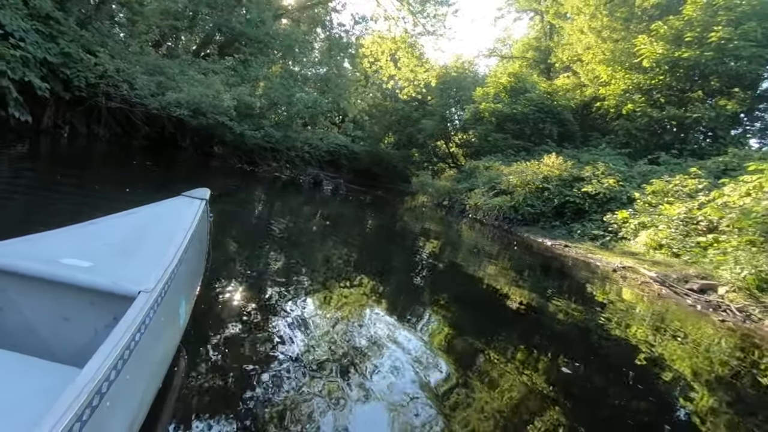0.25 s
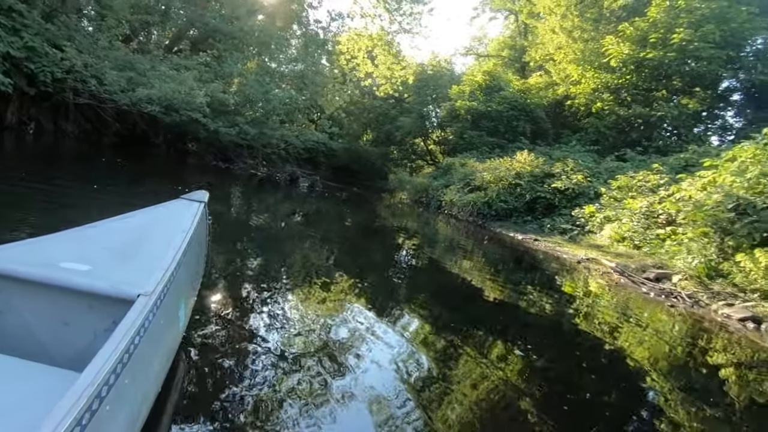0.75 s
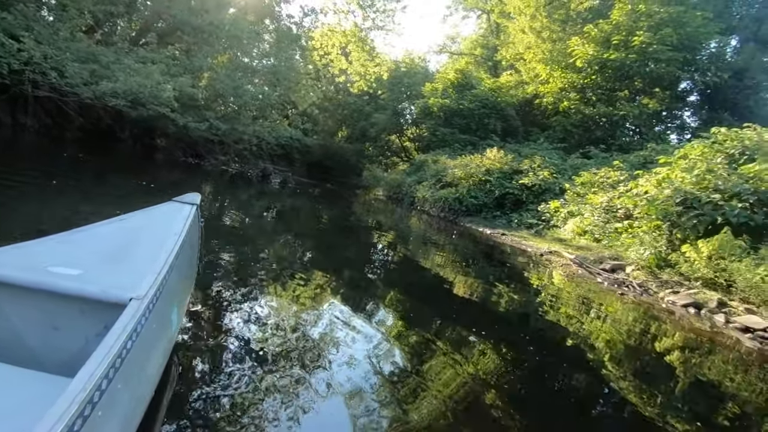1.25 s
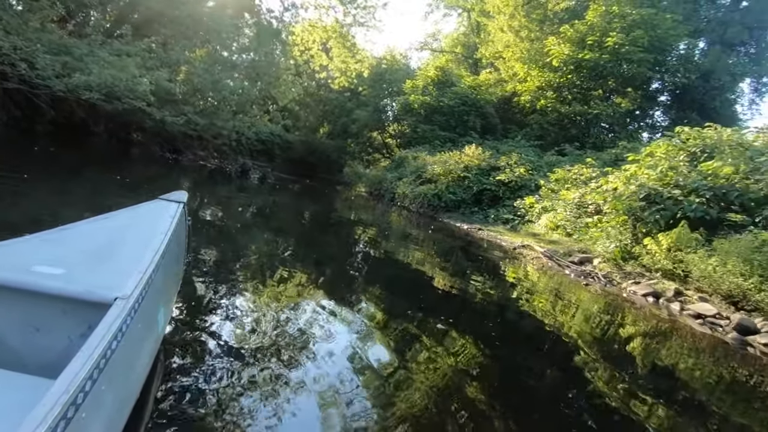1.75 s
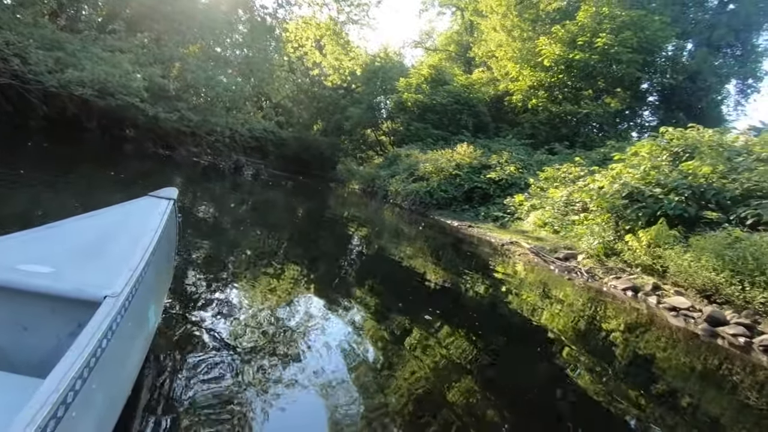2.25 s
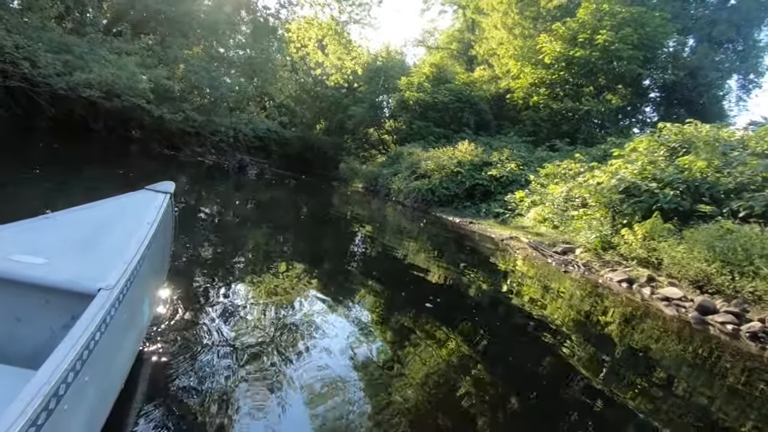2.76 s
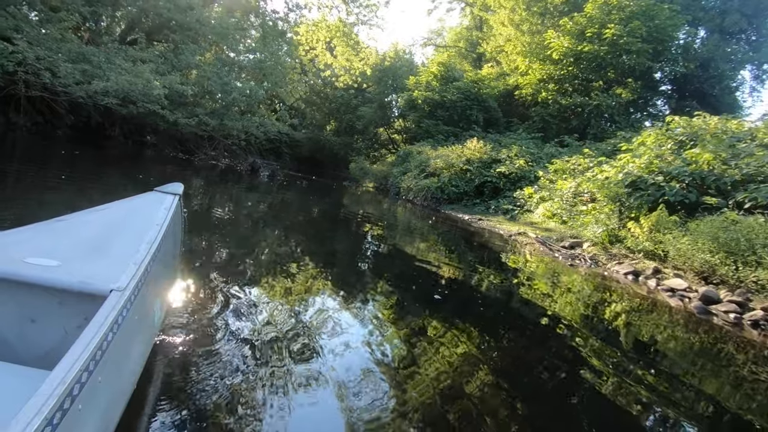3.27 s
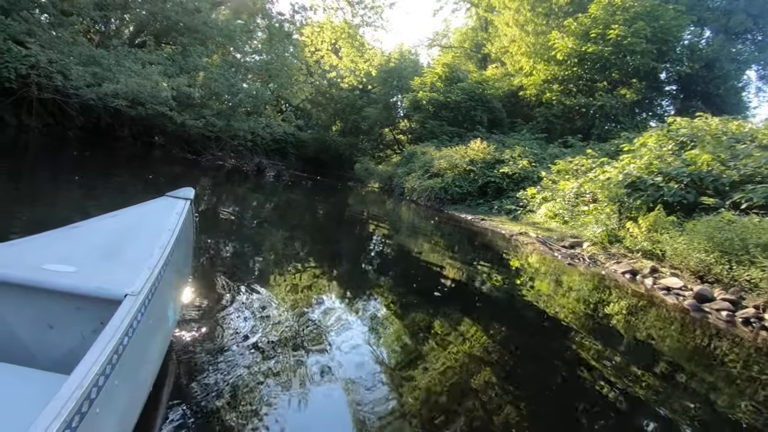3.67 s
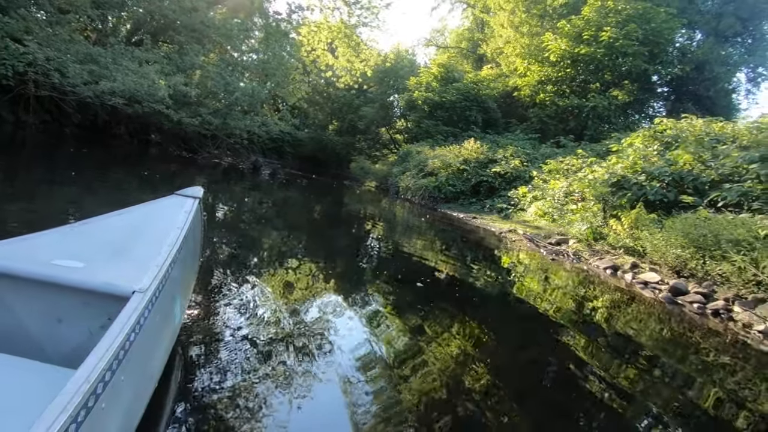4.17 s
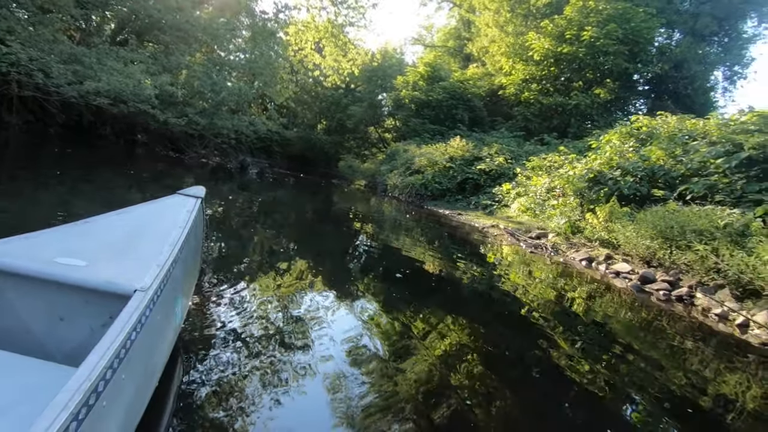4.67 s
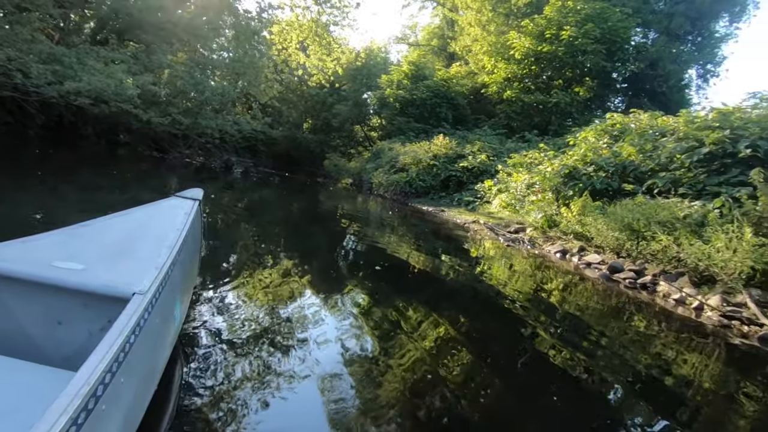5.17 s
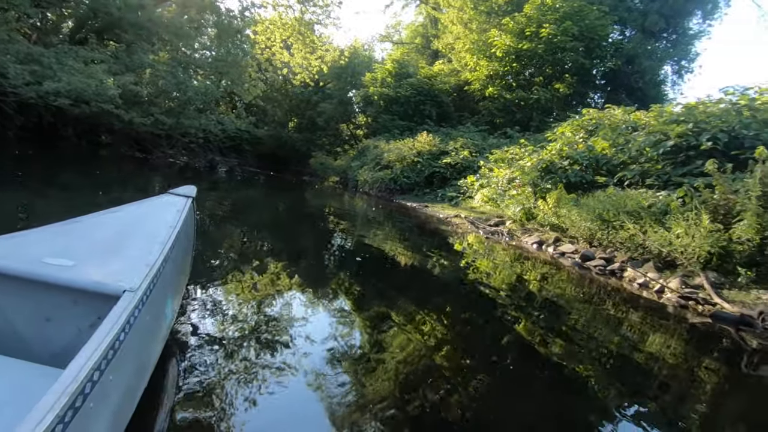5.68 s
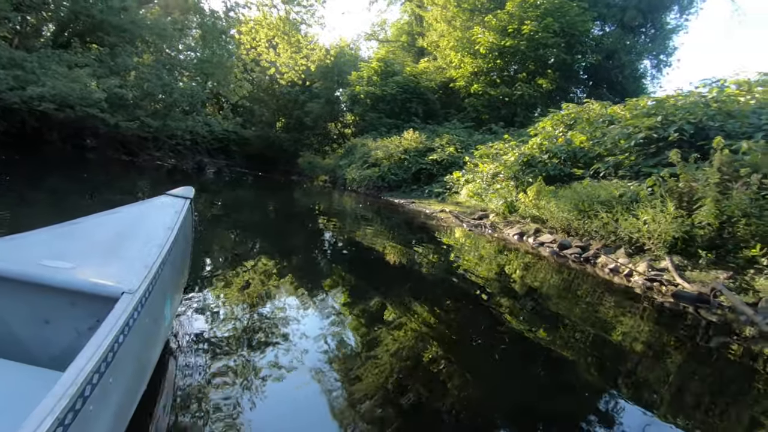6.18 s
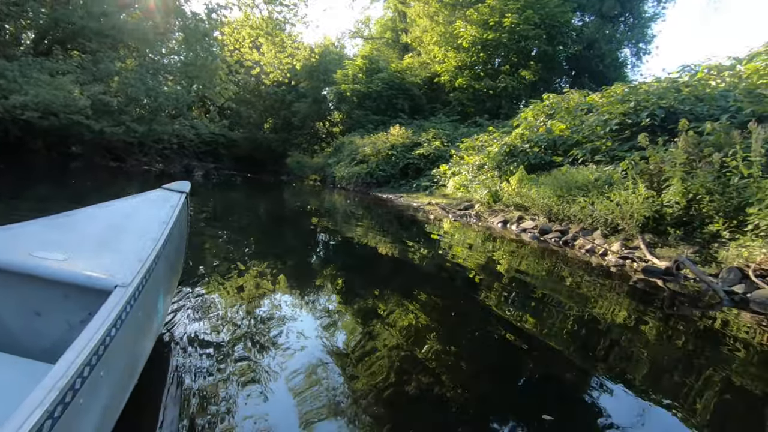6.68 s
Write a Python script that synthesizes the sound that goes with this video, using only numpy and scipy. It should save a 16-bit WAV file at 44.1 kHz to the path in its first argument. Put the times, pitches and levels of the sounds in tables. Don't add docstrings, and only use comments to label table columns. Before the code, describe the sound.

A calm river outdoors, heard from a microphone fixed to a metal canoe. Soft, lumpy far traffic rumble and a thin insect hiss run throughout, with deep light wind buffets. Around 0.4-1.2 s a distant engine pulls away, its low note climbing and fading; another far motor hums in faint swells, slowly falling in pitch. Two water drops plink at 1.9 and 2.1 s. Cloth flicks crackle near 3.1 s, then a first, lighter knock at 3.3 s clangs and rings hollowly. More cloth rustles at 4.2 s. A harder knock at 4.6 s rings on with small tinks, the background ducking, and stereo fades to centre as a quick follow-up lands at 5.0 s. A low drop sounds at 5.5 s. A sleeve slides from about 6 s; the final knock at 6.5 s is thuddy and quickly damped, followed by close fabric scrapes and motor hum.

```python
import sys
import numpy as np
from scipy import signal
from scipy.fft import rfft, irfft, next_fast_len
from scipy.io import wavfile
from scipy.ndimage import map_coordinates

SR = 44100
rng = np.random.default_rng(int(sys.argv[2]) if len(sys.argv) > 2 else 0)


def inscribe(sig):
    pcm = np.round(np.clip(np.atleast_2d(sig).T, -1, 1) * 32767)
    wavfile.write(sys.argv[1], SR, pcm.astype(np.int16))


def makeup_ratio(level_db):
    decades = np.asarray(level_db, float) / 20
    return 10 ** decades


N = 305877


def unit(x):
    return x / np.sqrt(np.mean(x ** 2) + 1e-20)


def along(points, hz):
    f, v = np.transpose(points)
    return np.interp(np.log(hz + 1), np.log(f + 1), v)


def curves(rows):
    s, *cols = np.transpose(rows)
    return [np.interp(np.arange(N) / SR, s, c) for c in cols]


def wobble(rate):
    knots = rng.standard_normal(int(N * rate / SR) + 4)
    return map_coordinates(knots, [np.arange(N) * rate / SR])


def swells(rows, rest_db):
    middle, length, db = np.transpose(rows)[:, :, None]
    bump = np.cos(np.pi * np.clip((np.arange(N) / SR - middle) / length, -.5, .5)) ** 2
    return makeup_ratio(rest_db) + np.sum(makeup_ratio(db) * bump, axis=0)


def filtered(x, response):
    m = next_fast_len(x.shape[-1] + 8192)
    return irfft(rfft(x, m) * response(np.fft.rfftfreq(m, 1 / SR)), m)[..., :x.shape[-1]]


def noise(spectrum, size=N):
    inside = lambda hz: (hz > spectrum[0][0]) & (hz < spectrum[-1][0])
    colour = lambda hz: makeup_ratio(along(spectrum, hz)) * inside(hz)
    return unit(filtered(rng.standard_normal(size), colour))


def band(hz, width):
    resonance = lambda f: (f * width / np.hypot(hz * hz - f * f, f * width)) ** 2
    return unit(filtered(rng.standard_normal(N), resonance))


def bands(rows):
    return sum(makeup_ratio(db) * band(hz, width) for hz, width, db in rows)


def add(track, s, sound):
    part = track[..., round(s * SR):][..., :sound.shape[-1]]
    part += sound[..., :part.shape[-1]]


def air(spectrum, db, white):
    x = unit(filtered(white, lambda hz: makeup_ratio(along(spectrum, hz))))
    deep = filtered(x, lambda hz: 1 / (1 + (hz / 85) ** 8))
    bass = filtered(x, lambda hz: 1 / (1 + (hz / 250) ** 4))
    lumps = makeup_ratio(1.9 * wobble(2.2) + 1.0 * wobble(9.1))
    treble_drift = makeup_ratio(0.47 * wobble(1.9))
    return makeup_ratio(db) * (unit(lumps) * (bass - deep) + treble_drift * (x - bass))


def surroundings():
    # f/Hz, level/dB per Hz
    air_mid = [(12, -44), (20, -35), (64, 3.5), (140, -5.5), (168, -9.5), (222, -11.5), (251, -16.5),
               (278, -14), (462, -23.5), (766, -21.5), (1300, -23), (4390, -48), (5510, -44.5),
               (6930, -51.5), (8480, -70.5), (11000, -93), (18700, -120)]
    # f/Hz, level/dB per Hz
    air_side = [(12, -29), (20, -6), (59, 2), (121, -1), (148, -6), (190, -1.5), (222, -10.5), (524, -18),
                (641, -8.5), (710, -8), (1300, -13), (4070, -41), (5510, -33.5), (6930, -40), (8480, -56),
                (11000, -79), (18700, -120)]
    # f/Hz, level/dB per Hz
    air_centre = [(12, -32.5), (22, -3), (70, -4.5), (115, -7.5), (175, -5.5), (300, -13.5), (473, -19.5),
                  (658, -23.5), (986, -21), (1560, -26.5), (3320, -50), (5240, -39.5), (7000, -47.5),
                  (8480, -69.5), (11000, -100)]
    air_db = [-33.5, -40, -38.5]
    # f/Hz, share
    quarter = [(400, 0.045), (950, .6), (2000, .55), (4400, 0.25), (5500, -.4), (7500, -.4)]
    # f/Hz, width/Hz, level/dB
    insects = [(5450, 430, -67.5), (6730, 820, -70.5)]
    # f/Hz, width/Hz, level/dB
    mount = [(656, 50, -63.5), (195, 25, -57)]
    white = rng.standard_normal((3, N))
    share = lambda hz: np.clip(along(quarter, hz), -1, 1)
    turned = filtered(white[0], lambda hz: 1j * share(hz))
    unrelated = filtered(white[1], lambda hz: np.sqrt(1 - share(hz) ** 2))
    mid = air(air_mid, air_db[0], white[0]) + bands(insects)
    side = air(air_side, air_db[1], turned + unrelated) + bands(insects + mount)
    return mid, side, air(air_centre, air_db[2], white[2])


def tone(hz, gain, orders, unsteady_db):
    phase = 2 * np.pi * np.cumsum(hz * (1 + 0.0022 * wobble(6))) / SR
    return gain * sum(makeup_ratio(db + unsteady_db * wobble(9.7)) * np.sin(round(k) * phase) for k, db in orders)


def motor():
    # t/s, f/Hz
    pitch = [(0, 124), (1.9, 126), (3.3, 124), (5.6, 120.6), (6.94, 119.2)]
    # middle t/s, length/s, level/dB
    carried = [(.7, 0.39, -48.5), (1.3, 0.34, -55), (1.85, 0.52, -44.5), (3.0, .55, -46.5),
               (5.93, 0.69, -39.5), (6.92, 0.37, -36)]
    # multiple, level/dB
    multiples = [(1, -16), (2, 1), (4, -12)]
    [hz] = curves(pitch)
    return tone(hz, swells(carried, rest_db=-54), multiples, unsteady_db=-1.4)


def passing_engine():
    # t/s, f/Hz, level/dB
    passer = [(.35, 148, -61), (.5, 157.1, -40), (.75, 169.8, -34.5), (.95, 182, -42.5),
              (1.2, 184.4, -47.5)]
    hz, db = curves(passer)
    return tone(hz, makeup_ratio(db), [(1, 0)], unsteady_db=2.0)


def drops():
    # t/s, f/Hz, level/dB, t60/s
    plinks = [
        (1.94, 510, -33.5, 0.11),
        (2.14, 480, -33, 0.072),
        (5.47, 427, -38.5, 0.13),
    ]
    out, t = np.zeros(N), np.arange(SR // 4) / SR
    for s, hz, db, t60 in plinks:
        envelope = makeup_ratio(db - 60 * t / t60) * (1 - np.exp(-t / 0.0029))
        add(out, s, envelope * np.sin(2 * np.pi * hz * t * (1 + 0.17 * t)))
    return out


def wind(wide):
    # middle t/s, length/s, level/dB
    gusts = [(.58, 0.48, -39), (1.12, .3, -36.5), (1.36, 0.085, -36.5), (1.55, 0.37, -34.5),
             (2.08, 0.26, -41.5), (2.33, 0.51, -36), (2.63, .12, -33), (2.92, 0.37, -34.5),
             (3.45, 0.67, -32), (3.94, 0.12, -31), (4.15, 0.22, -38), (4.4, 0.37, -36.5), (4.7, 0.36, -19),
             (5.08, 0.58, -27), (5.498, 0.23, -34), (5.85, .4, -40.5), (6.21, 0.18, -41),
             (6.75, 0.53, -33.5)]
    # f/Hz, level/dB per Hz
    turbulence = [(15, -26.5), (25, -1.5), (40, -3.5), (62, 3.5), (80, 1), (95, -31)]
    opposed = makeup_ratio(-10.0) * wide * noise(turbulence) * [[1], [-1]]
    return swells(gusts, rest_db=-41) * (noise(turbulence) + opposed)


def cloth():
    # t/s, peak level/dB, t60/s, left against right/dB, top above 8 kHz/dB
    rustle = [(3.0498, -48.5, 0.087, -3, -4.5), (3.076, -49.5, 0.24, 0.5, -11.5),
              (3.166, -40, 0.042, 3, -9), (3.2, -54, 0.1, -5, -3), (4.2044, -56, 0.082, 6.5, -5),
              (4.2263, -35, 0.066, 2, -7.5), (4.2587, -48, 0.081, -5, -8), (4.6784, -54.5, 0.12, -13.5, 5),
              (5.2854, -50.5, 0.1, -1, -12), (6.78, -52, 0.11, -6, -25)]
    # f/Hz, level/dB
    fabric = [(800, -29), (2000, 4), (4000, -3.5), (7000, -1), (8200, -9.5), (12000, -20.5), (15500, -29),
              (16500, -70)]
    out, t = np.zeros((2, N)), np.arange(SR // 4) / SR
    for s, db, t60, pan_db, top_db in rustle:
        catches = np.repeat(rng.standard_normal(len(t) // 60 + 1), 60)[:len(t)]
        fibres = unit(makeup_ratio(1.2 * catches))
        white = rng.standard_normal((2, len(t))) + 0.79 * rng.standard_normal(len(t))
        flick, drag = makeup_ratio(db - 60 * t / t60), makeup_ratio(db - 23.5 - 60 * t / 0.48)
        shape = (flick + drag) * (1 - np.exp(-t / 0.0014))
        top = lambda hz: top_db * np.clip((hz - 8000) / 2000, 0, 1)
        colour = lambda hz: makeup_ratio(along(fabric, hz) + top(hz) + 3.0)
        add(out, s, filtered(shape * fibres * white, colour) * makeup_ratio([[pan_db / 2], [-pan_db / 2]]))
    return out


def sleeve():
    strokes = [(6.139, .45, 0.21, .1, -61.5), (6.537, .01, .002, 0.017, -60),
               (6.62, .06, 0.033, 0.061, -72), (6.793, .08, .03, .02, -62),
               (6.833, 0.011, 0.058, 0.025, -51.5), (6.93, 0.069, .02, .02, -52)]
    # f/Hz, level/dB per Hz
    slide = [(530, -39), (900, -7), (1230, -5.5), (1440, -4.5), (2430, -13), (2670, -12.5), (3410, -14),
             (4230, -7), (5350, -13.5), (6400, -12), (7200, -24), (8480, -24), (11000, -51), (18700, -120)]
    s, attack, hold, release, db = np.transpose(strokes)[:, :, None]
    t = np.arange(N) / SR - s
    away = np.maximum(np.maximum(-t / attack, (t - hold) / release), 0)
    gain = np.sum(makeup_ratio(db - 19 * away), axis=0)
    return gain * makeup_ratio(1.2 * wobble(60)) * noise(slide)


def fittings():
    # t/s, f/Hz, level/dB, t60/s
    tinks = [(4.644, 2000, -27, .03), (4.648, 2250, -30, .025), (4.228, 660, -36, .25),
             (3.405, 682, -29, .2)]
    out, t = np.zeros(N), np.arange(SR) / SR
    for s, hz, db, t60 in tinks:
        envelope = makeup_ratio(db - 60 * t / t60) * (1 - np.exp(-t / 0.0012))
        add(out, s, envelope * np.sin(2 * np.pi * hz * t))
    return out


def ring(modes, which, beat_db):
    t = np.arange(SR) / SR
    hz, t60, rise, *levels = np.transpose(modes)[:, :, None]
    knots = rng.standard_normal((2, len(modes), 36))
    spread = np.linspace(0, 1, 36)
    swell, drift = [np.array([np.interp(t, spread, row) for row in k]) for k in knots]
    grown = (1 - np.exp(-t / 0.011)) * np.clip(hz / 400, .4, 1.3)
    sign = (-1) ** np.arange(len(modes))[:, None]
    level_db = levels[which] - 60 * t / t60 + beat_db * grown * np.minimum(swell, 1.2)
    shape = makeup_ratio(level_db) * (1 - np.exp(-t / rise)) ** 2 * (1 - t ** 2)
    return np.sum(sign * shape * np.sin(2 * np.pi * hz * t + 0.2 * beat_db * grown * drift), axis=0)


def hull():
    # t/s, force/dB, crack level/dB, dense ring level/dB, damping by the resting hand/dB per s
    knocks = [
        (3.316, 2.5, -29.5, -27.5, -1.5),
        (4.5585, 14.5, -30, -25, 3.5),
        (4.9745, 17.5, -30, -30, 17),
        (6.529, 18.5, -32, -28.5, 44.5),
    ]
    # second contact/s, its level/dB, dull rebound/s, its level/dB
    chatter = [(0.014, -5, 0.2, -9), (0.014, -13, 0.08, -37), (0.0093, -2.5, .124, -4.5),
               (0.0073, 0.5, .06, -21)]
    # f/Hz, t60/s, build-up/s, level/dB in knock 1, 2, 3, 4
    hull_modes = [(97.8, 1.63, 0.01, -19, -15, -44.5, -35.5), (114.3, 2.3, 0.0033, -26, -23.5, -28, -49.5),
                  (122.6, 1.17, 0.012, -17.5, -24, -28, -26.5),
                  (138.8, 1.25, 0.016, -33, -15.5, -36, -34.5),
                  (156.2, 0.45, 0.0027, -16.5, -32.5, -30, -31.5),
                  (178, 0.81, 0.016, -29.5, -26.5, -19.5, -22.5),
                  (196.4, 1.07, 0.044, -18.5, -12.5, -22, -28.5), (214, 1.01, .01, -34, -27.5, -31, -21.5),
                  (240, 1.4, 0.014, -34.5, -28.5, -31, -38),
                  (277, 0.91, 0.068, -37, -20.5, -50.5, -49.5),
                  (293.6, 0.49, 0.013, -24, -32, -48.5, -32.5), (360, 0.26, 0.024, -49.5, -35.5, -42, -25),
                  (392, 0.34, 0.0042, -40, -37.5, -41, -28), (480, 0.37, 0.0038, -34.5, -49.5, -55, -35),
                  (624, 0.6, 0.0051, -29, -51, -49.5, -57.5), (640, .6, 0.0085, -45.5, -31, -46, -54),
                  (664, 0.5, 0.009, -36, -27.5, -46, -57), (744, 0.43, 0.0076, -52, -31, -65, -50),
                  (907, 0.3, 0.011, -46.5, -31.5, -66, -69)]
    # f/Hz, t60/s, build-up/s, level/dB in knock 1, 2, 3, 4
    clang_modes = [(244.3, 0.15, 0.0011, -50, -39, -36, -19), (371, 0.076, 0.0019, -43.5, -45, -33, -18),
                   (510, 0.059, 0.00093, -39, -50, -47.5, -31.5),
                   (617, .14, 0.0058, -12, -25.5, -23.5, -51.5),
                   (668, 0.094, 0.0033, -9.5, -19.5, -19, -50.5),
                   (630, 0.13, 0.0078, -21.5, -16.5, -16.5, -52),
                   (762, 0.069, 0.0014, -52.5, -42, -50, -23.5),
                   (859, 0.12, 0.0023, -24.5, -28.5, -31, -34), (895, 0.14, 0.0045, -42, -20.5, -30.5, -56),
                   (1320, 0.28, 0.0011, -51, -50, -52, -47), (1496, 0.12, 0.001, -39, -43.5, -42, -68),
                   (1872, 0.051, 0.00051, -47, -42.5, -42.5, -60),
                   (2090, .06, 0.0011, -40.5, -52, -44.5, -63)]
    # f/Hz, level/dB
    packed = [(25, -15), (60, -5.5), (100, -4), (200, 0), (330, 6), (500, -12.5), (660, -13), (950, -29),
              (1500, -28.5), (3000, -48)]
    # f/Hz, level/dB
    contact = [(300, -25.5), (900, 13.5), (2000, -0.5), (3500, -17), (5600, -20), (7500, -33.5),
               (12000, -52)]
    out, dense, t = np.zeros(N), np.zeros((2, N)), np.arange(SR) / SR
    for which, (s, force_db, crack_db, dense_db, damp_db) in enumerate(knocks):
        second, second_db, after, rebound_db = chatter[which]
        shell = makeup_ratio(4 - damp_db * t) * ring(hull_modes, which, beat_db=8.5)
        crack = makeup_ratio(crack_db - 60 * t / 0.034) * (1 - np.exp(-t / 0.0025)) * noise(contact, size=SR)
        clang = ring(clang_modes, which, beat_db=-3.0) + crack
        add(out, s, makeup_ratio(force_db) * (shell + clang))
        add(out, s + second, makeup_ratio(force_db + second_db) * clang)
        add(out, s + after, makeup_ratio(force_db + rebound_db - 60 * t / 1.2) * shell)
        rumble = np.array([noise(packed, size=SR), noise(packed, size=SR)])
        decay = makeup_ratio(force_db + dense_db - 60 * t / 0.76)
        add(dense, s, decay * (1 - np.exp(-t / 0.006)) * (1 - t ** 2) * rumble)
    return out + dense


def left_port(knock):
    # f/Hz, level/dB
    left_db = [(60, -13), (130, -15), (300, -12), (480, -8), (600, -3.5), (900, -1.5), (3000, -1)]
    # f/Hz, phase lead/rad
    left_lead = [(60, -.8), (300, -.9), (480, -2.5), (600, -3.4), (900, -3.65), (2000, -4.2), (4000, -5.2)]
    return filtered(knock, lambda hz: makeup_ratio(along(left_db, hz)) * np.exp(1j * along(left_lead, hz)))


def centre_port(knock):
    # f/Hz, level/dB
    centre_db = [(60, -13.5), (130, -22), (250, -24), (500, -15), (650, -22), (900, -15), (3000, -20.5)]
    return filtered(knock, lambda hz: makeup_ratio(along(centre_db, hz)))


def self_noise():
    # f/Hz, level/dB per Hz
    hiss = [(7500, -5), (8500, -4.5), (11000, -5), (13500, -11), (14500, -32)]
    # f/Hz, width/Hz, level/dB
    centre_hiss = (13000, 1500, -101)
    return makeup_ratio(-84.5) * np.array([noise(hiss), noise(hiss)]), bands([centre_hiss])


def camera():
    # t/s, depth/dB, hold/s, recovery/dB per s
    ducks = [
        (3.32, 2.5, .38, 5.5),
        (4.563, 15, 0.49, 9.5),
        (6.565, 2.5, .5, 6.1),
    ]
    pull_s, fade_at_s, fade_length_s = 0.02, 4.42, 0.95
    s, depth_db, hold, recover = np.transpose(ducks)[:, :, None]
    t = np.arange(N) / SR
    down_db = depth_db * np.clip((t - s) / pull_s, 0, 1) - recover * np.maximum(t - s - hold, 0)
    turn = np.pi / 2 * np.clip((t - fade_at_s) / fade_length_s, 0, 1)
    return makeup_ratio(-np.sum(np.maximum(down_db, 0), axis=0)), np.cos(turn), np.sin(turn)


def scene():
    gain, wide, mono = camera()
    mid, side, centre_air = surroundings()
    river = motor() + passing_engine() + drops()
    flicks = cloth()
    knocks = hull() + fittings()
    pair_hiss, centre_hiss = self_noise()
    mid = mid + river
    pair = np.array([left_port(knocks[0]) + mid + side, knocks[1] + mid - side]) + flicks + pair_hiss
    centre = centre_port(knocks[1]) + centre_air + river + makeup_ratio(-1.5) * flicks[0] + centre_hiss
    buffet = (wide + makeup_ratio(-5.5) * mono) * wind(wide)
    return gain * (wide * pair + mono * centre + buffet) + sleeve()


def low_pass(x):
    return signal.sosfilt(signal.butter(12, 15000, fs=SR, output="sos"), x)


def record(dry):
    mix = dry / (1 + np.abs(dry / .97) ** 8) ** (1 / 8)
    return low_pass(mix)


dry = scene()
out = record(dry)
inscribe(out)
```